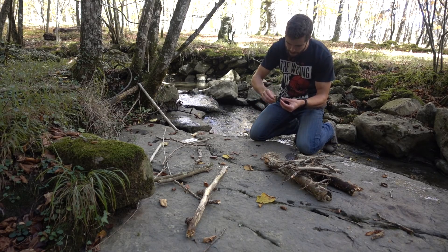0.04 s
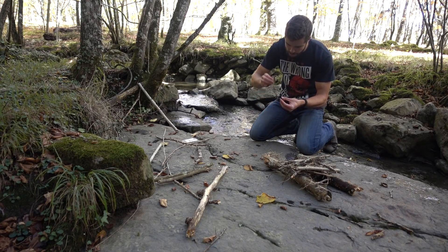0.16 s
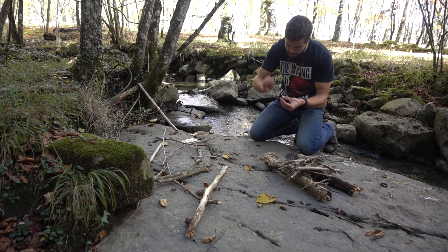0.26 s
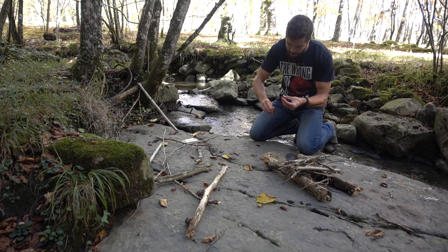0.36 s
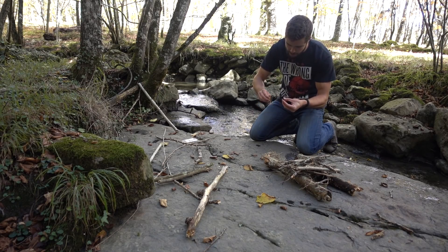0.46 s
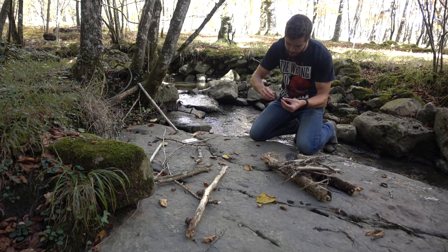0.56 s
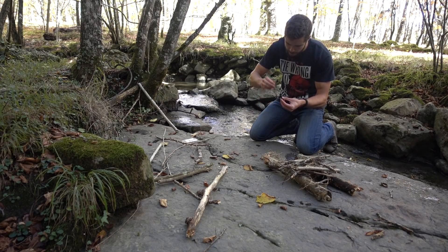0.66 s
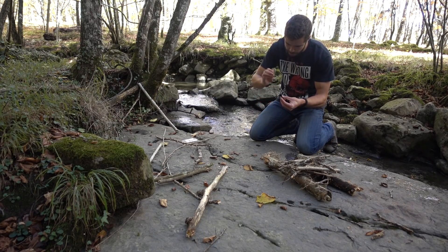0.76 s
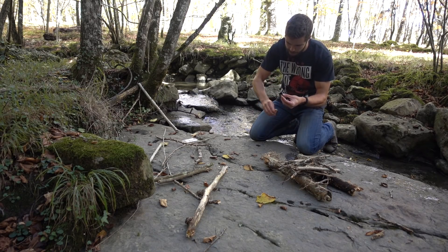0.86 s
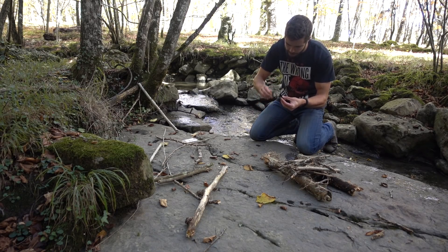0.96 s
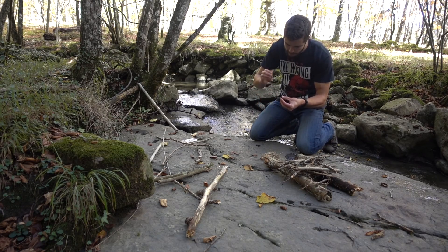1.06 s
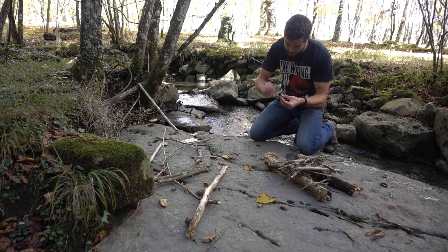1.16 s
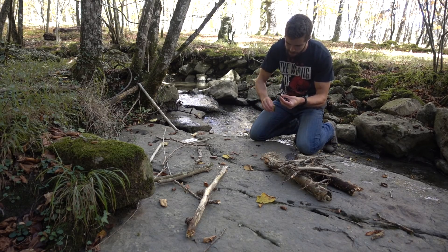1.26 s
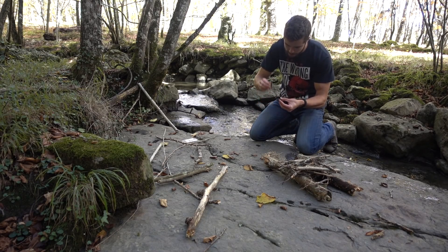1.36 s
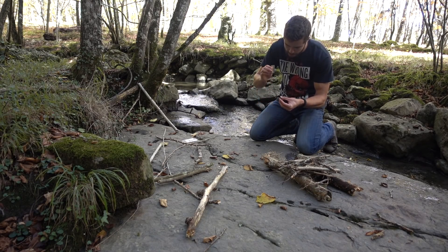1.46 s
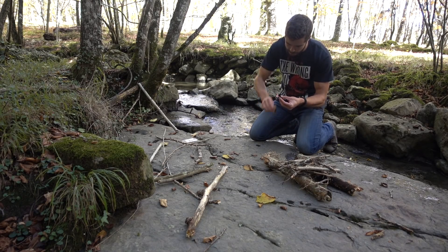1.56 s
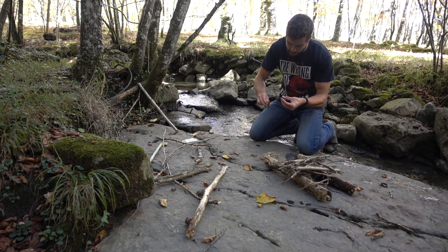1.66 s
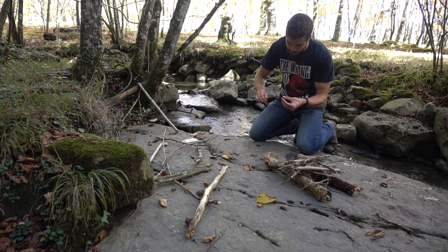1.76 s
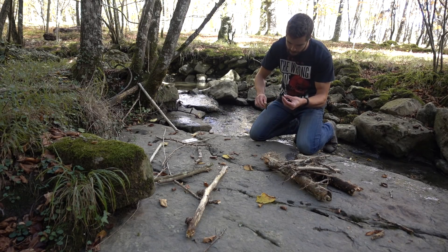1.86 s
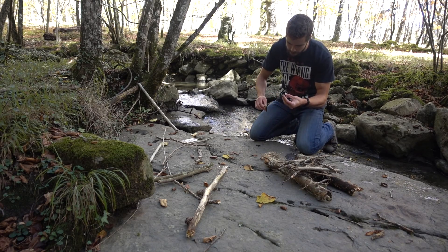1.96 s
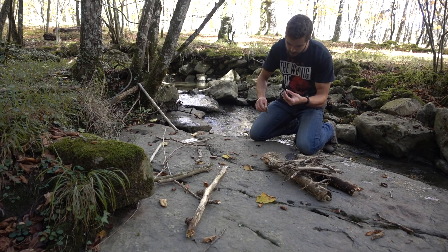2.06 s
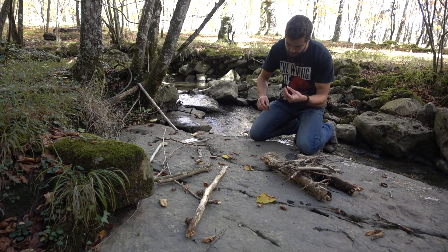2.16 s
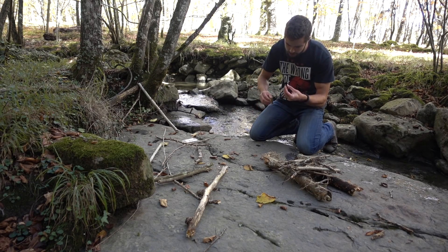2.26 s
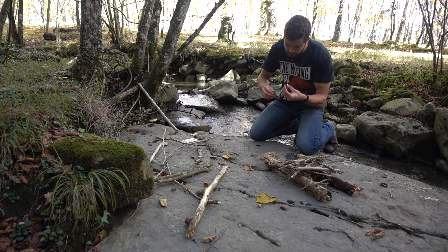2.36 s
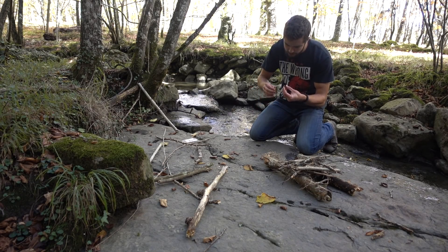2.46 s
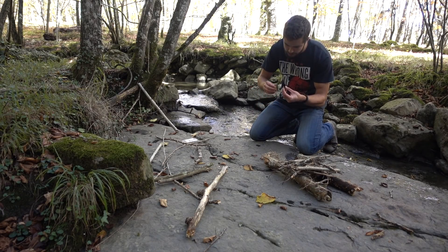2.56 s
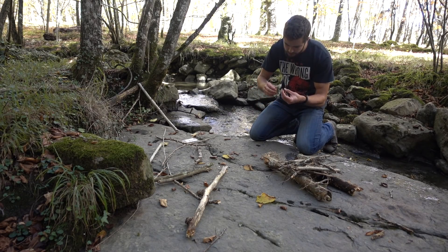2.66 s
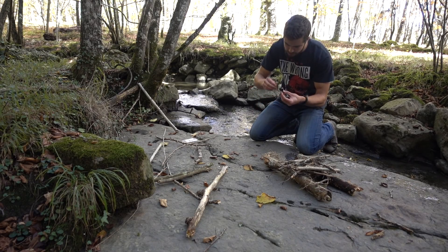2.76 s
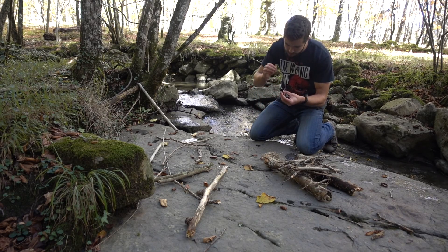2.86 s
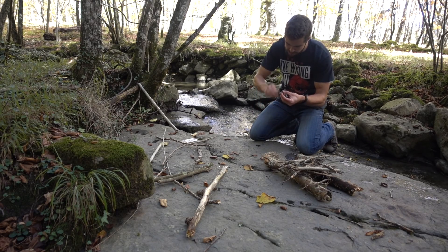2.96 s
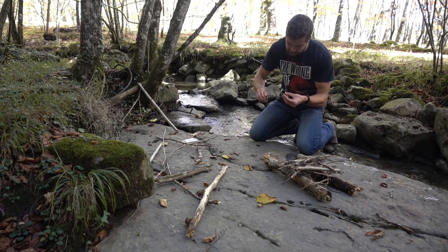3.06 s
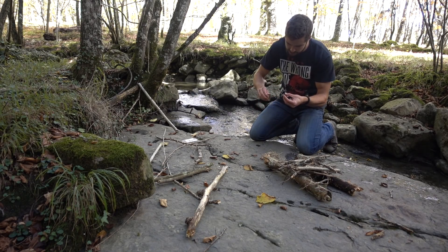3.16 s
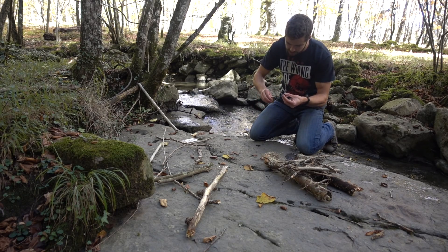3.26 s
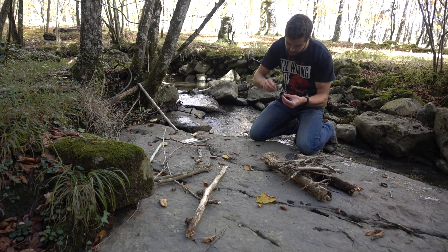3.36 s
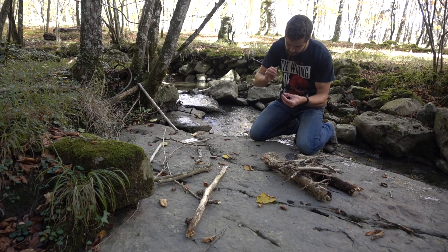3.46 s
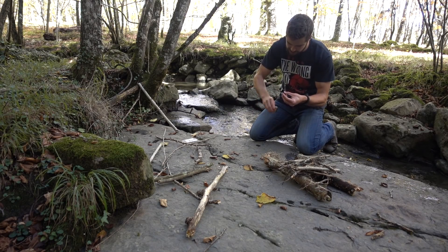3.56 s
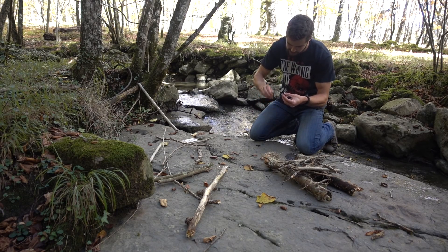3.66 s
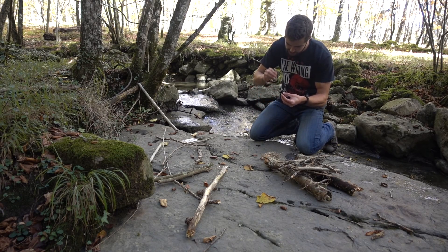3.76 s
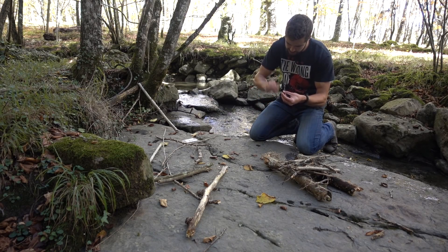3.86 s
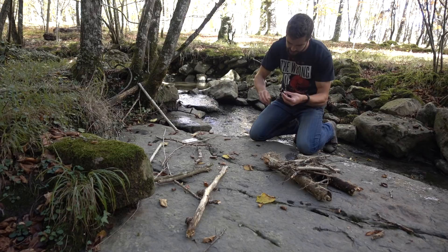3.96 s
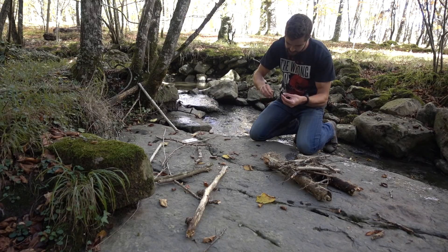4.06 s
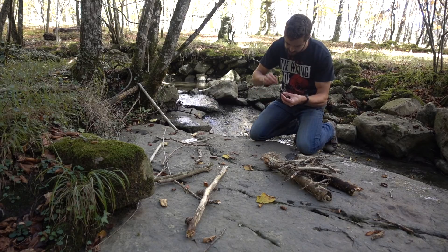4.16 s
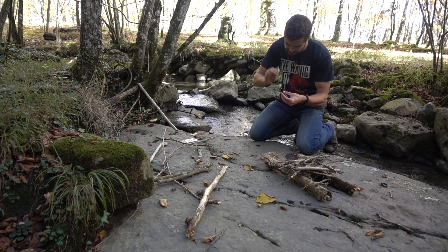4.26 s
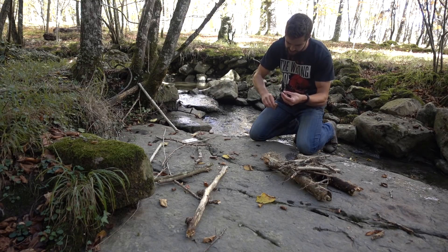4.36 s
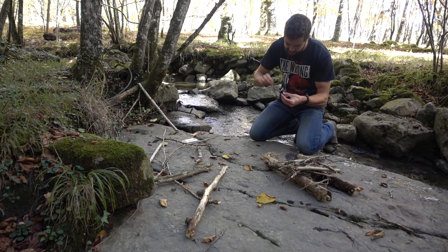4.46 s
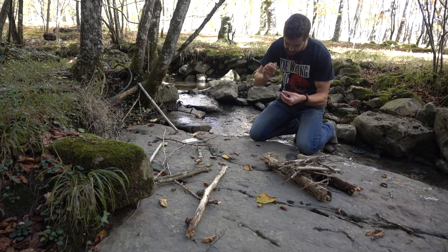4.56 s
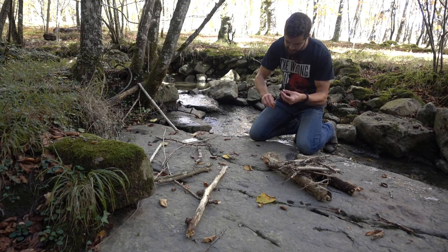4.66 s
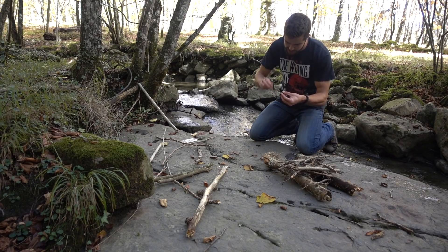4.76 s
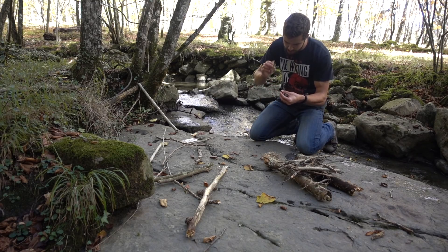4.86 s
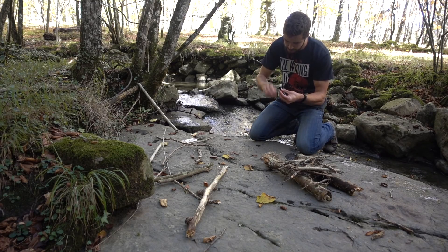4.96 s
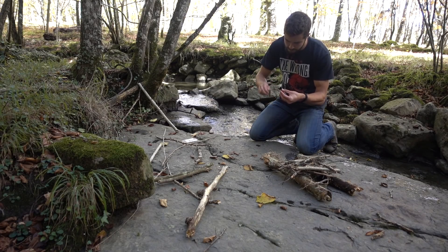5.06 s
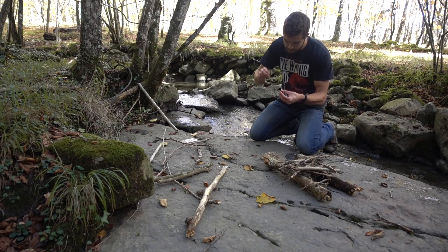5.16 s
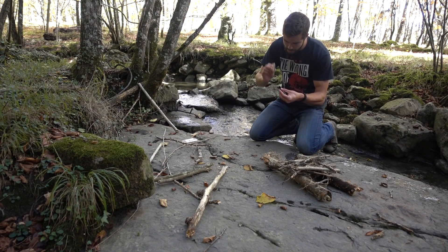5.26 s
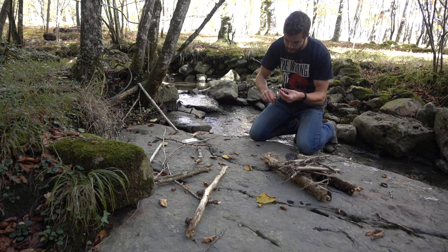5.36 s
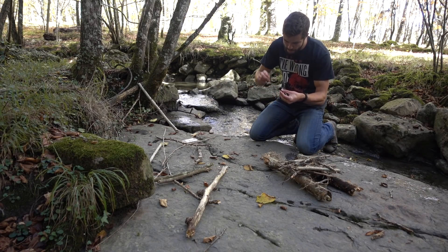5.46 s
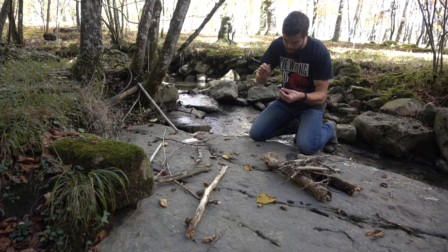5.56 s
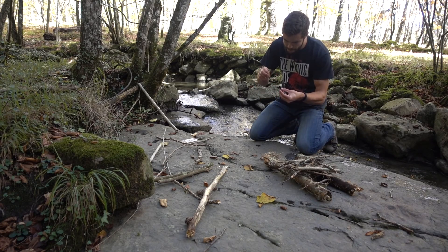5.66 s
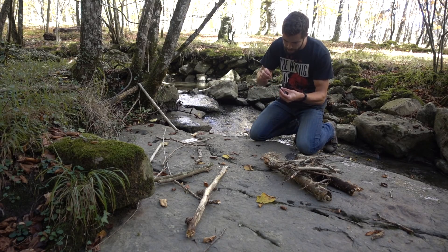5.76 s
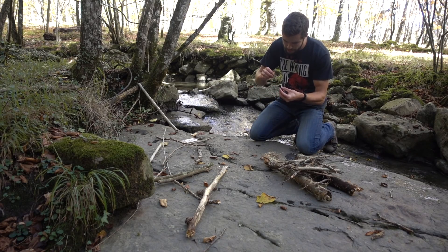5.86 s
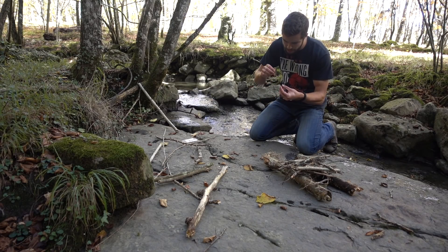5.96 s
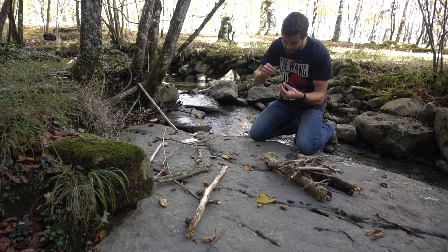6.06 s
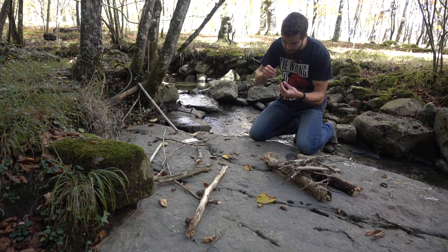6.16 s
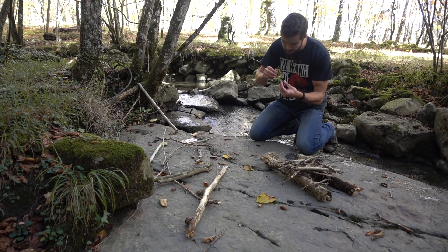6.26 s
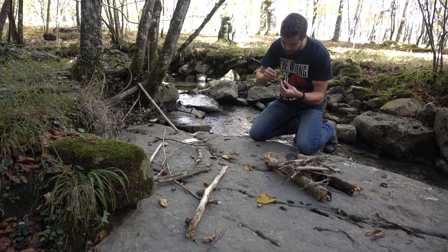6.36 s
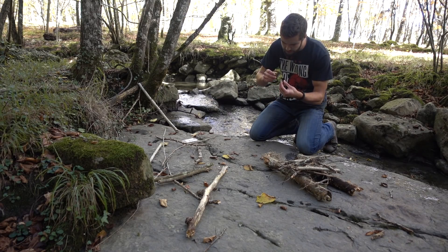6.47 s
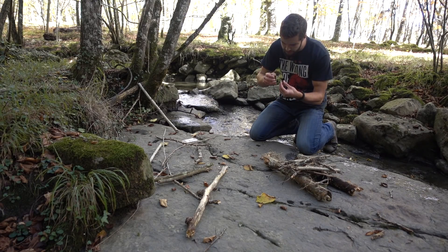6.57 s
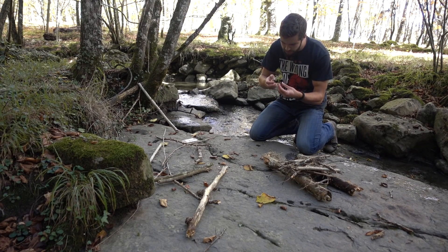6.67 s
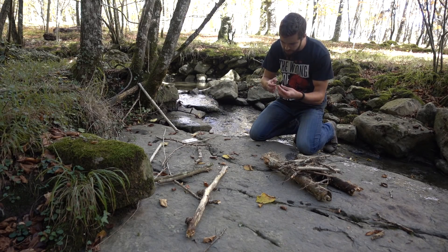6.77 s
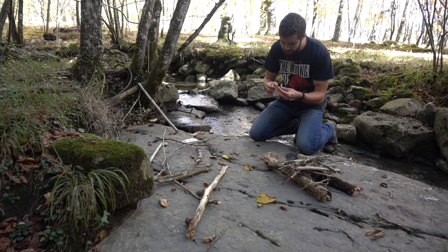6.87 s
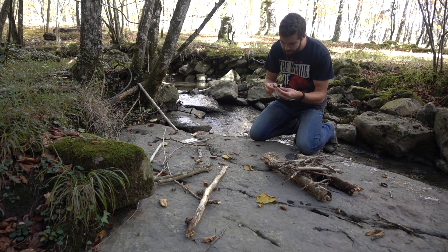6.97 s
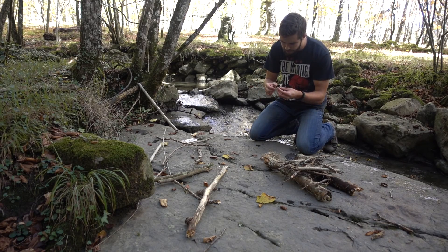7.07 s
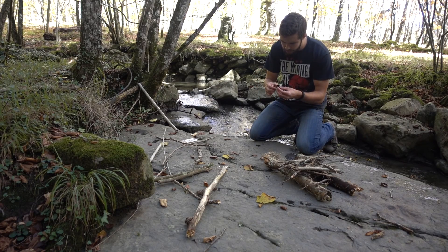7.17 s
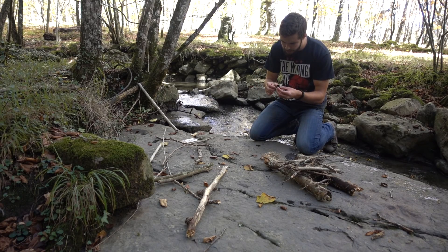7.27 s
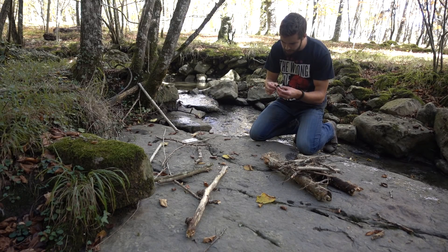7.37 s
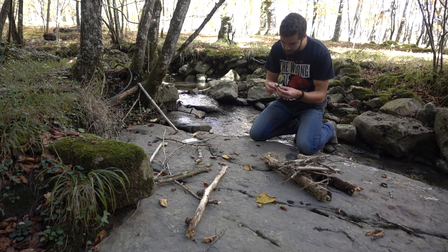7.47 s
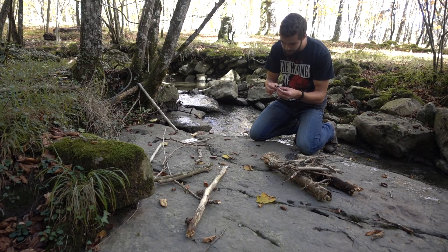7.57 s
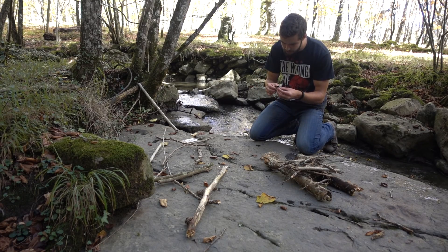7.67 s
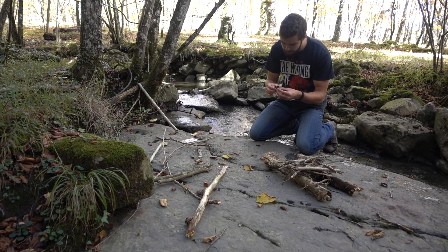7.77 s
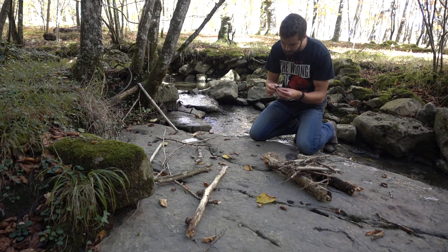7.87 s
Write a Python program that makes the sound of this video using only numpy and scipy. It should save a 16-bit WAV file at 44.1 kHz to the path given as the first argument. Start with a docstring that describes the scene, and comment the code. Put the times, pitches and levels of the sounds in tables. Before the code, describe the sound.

A small forest stream runs throughout, slightly left of centre: a soft, steady hiss with countless little bubbles, occasional clearer plops and faint high droplet ticks. In front of it, slightly to the right, a flint is struck against a hand-held steel six times. Each blow is a very brief, bright, gritty click with a trace of muffled metallic ring, no bass, and a short echo from rocks and trees. A light strike comes at about 0.4 seconds, strong ones at 1.6, 3.0, 4.0 and 5.0 seconds, and another light one at 5.4. At about 2.1 and 2.5 seconds come two faint, hoarse, distant whistles, probably a bird, the first rising, the second rising then dropping. From about 6.8 seconds the flint is turned in the fingers with small ticks and rubs, while the water carries on until the end at around 8 seconds.

```python
"""Flint and steel by a stream

Someone kneeling on a rock slab strikes a flint on a hand-held steel six times, then fingers the flake.
Each blow glances, bites and scrapes for a few milliseconds; rocks and tree trunks scatter it back.
Just behind, a little to the left, a small forest stream runs steadily: tiny splashes merge into a hiss,
and trapped air rings as countless bubbles and some clear plops.
Far off come two faint rising whistles, probably a bird."""
import sys
import numpy as np
from scipy import signal
from scipy.fft import rfft, irfft
from scipy.io import wavfile
from scipy.ndimage import uniform_filter1d

SR = 44100
rng = np.random.default_rng(int(sys.argv[2]) if len(sys.argv) > 2 else 0)


def inscribe(sig):
    """Save sig as 16-bit PCM at rate SR to the path in sys.argv[1].

    A 1-D sig is mono; a 2-D sig holds one channel per row.
    Samples are clipped to [-1, 1] before scaling.
    """
    pcm = np.round(np.clip(np.atleast_2d(sig).T, -1, 1) * 32767)
    wavfile.write(sys.argv[1], SR, pcm.astype(np.int16))


N = 349272
STREAM_LAG_S, HANDS_LAG_S = 8.5e-5, -1.8e-5  # how much sooner the left side hears each


def undb(db):
    """Turn decibels into a number to multiply by."""
    return 10 ** (np.asarray(db) / 20)


def unit(x):
    """Scale to an average strength (rms) of 1."""
    return x / np.sqrt(np.mean(x ** 2) + 1e-24)


def fade(t, t60):
    """Die away by 60 dB in the fade time t60."""
    return np.exp(-np.log(1000) * t / t60)


def surge(rate):
    """A smooth random swell of strength 1 that turns about rate times a second."""
    size = int(SR / rate)
    steps = np.repeat(rng.standard_normal(N // size + 1), size)
    return unit(uniform_filter1d(steps, size)[:N])


def hump(hz, centre_hz, width_hz):
    """The curve of a resonance: 1 at its centre, less on either side."""
    return 1 / (1 + ((hz - centre_hz) / width_hz) ** 2)


def read(points, hz):
    """Look up a frequency between the rows of an (f/Hz, value) table."""
    f, value = np.transpose(points)
    return np.interp(np.log(hz + 1), np.log(f), value)


def shape(x, response):
    """Multiply each frequency in a sound by response(hz)."""
    size = x.shape[-1]
    return irfft(rfft(x) * response(np.fft.rfftfreq(size, 1 / SR)), size)


def resonate(x, gain_db):
    """Boost each frequency by gain_db(hz), so that nothing rings ahead of its cause."""
    size = 2 * len(x)
    cepstrum = irfft(np.log(undb(gain_db(np.fft.rfftfreq(size, 1 / SR)))))
    causal = np.r_[cepstrum[0], 2 * cepstrum[1:len(x)]]
    return irfft(rfft(x, size) * np.exp(rfft(causal, size)))[:len(x)]


def cut_bass(x, hz, order=3):
    """Weaken everything below hz."""
    return signal.sosfilt(signal.butter(order, hz, "high", fs=SR, output="sos"), x)


def place(x, pan_db, lag_s):
    """One side hears a sound louder and sooner; positive values move it left."""
    late = shape(x, lambda hz: np.exp(-2j * np.pi * hz * lag_s))
    return np.array([x * undb(pan_db / 2), late * undb(-pan_db / 2)])


def add(out, s, x):
    """Mix a sound in, starting at s seconds."""
    i = int(np.clip(s * SR, 0, N - 1))
    out[..., i:i + x.shape[-1]] += x[..., :N - i]


# The tone of the stream's hiss: f/Hz, level/dB
WASH_TONE = [(100, -47), (200, -39), (310, -35.5), (400, -28), (500, -20), (630, -14.5), (850, -7),
             (1250, -6.5), (1800, -3.5), (2300, -3), (3100, -6.5), (4900, -9.5), (7500, -14),
             (10000, -16.5), (12000, -20), (15500, -21.5)]
# Which side the hiss leans to: f/Hz, left minus right/dB
WASH_PAN = [(100, 0.8), (700, 2.47), (1300, 2.3), (2400, 0.8), (4400, -1.5), (15000, -2.5)]
# How much of the hiss comes straight from the water: f/Hz, share (0-1)
WASH_DIRECT = [(100, 1), (640, 0.85), (1400, 0.83), (3100, 0.32), (7000, 0.077), (15000, 0.066)]


def wash(db=-47.5, flicker_db=1.95, spray_db=2.5):
    """Countless tiny splashes merge into a hiss; its lows come straight, its highs from all around."""
    water = rng.standard_normal((3, N))
    spray = np.repeat(rng.standard_normal((3, N // 16 + 1)), 16, axis=1)[:, :N]
    # cut the sound into small cells of pitch and time, and let their levels flicker
    _, _, cells = signal.stft(water * undb(spray_db * spray), SR, nperseg=256)
    flicker = uniform_filter1d(rng.standard_normal(cells.shape), size=9, axis=1)
    flicker = unit(uniform_filter1d(flicker, size=5, axis=2))
    water = signal.istft(cells * undb(flicker_db * flicker), SR)[1][:, :N]
    direct = shape(place(water[0], 0, STREAM_LAG_S), lambda hz: np.sqrt(read(WASH_DIRECT, hz)))
    around = shape(water[1:], lambda hz: np.sqrt(1 - read(WASH_DIRECT, hz)))
    sides = np.array([[.5], [-.5]])
    hiss = shape(direct + around, lambda hz: undb(read(WASH_TONE, hz) + sides * read(WASH_PAN, hz)))
    return undb(db) * unit(hiss)


def bubble(hz, cycles, glide, swell_s=.001):
    """A pocket of air rings, rising in pitch as it nears the surface; it fades 60 dB over its cycles."""
    t = np.arange(int((cycles / hz + swell_s) * SR) + 2) / SR
    turns = hz * t
    swell = 1 - np.exp(-(t / swell_s) ** 2)
    ring = np.sin(2 * np.pi * turns * (1 + glide * turns / cycles / 2)) * fade(turns, cycles) * swell
    return ring / np.abs(ring).max()


# How the bubbles' pitches are spread: share of bubbles that are lower (0-1), f/Hz
BUBBLE_PITCHES = [(0, 792), (0.049, 944), (.15, 1211), (.30, 1645), (0.479, 1774), (.76, 2322), (1, 3433)]
# The babble swells and sinks with the flow over the stones: t/s, level/dB
FLOW = [(0, 0.5), (.6, -0.5), (1.0, .5), (1.95, -.5), (2.25, 2.5), (2.55, 0.5), (2.9, 0.5), (3.3, 0),
        (4.3, 0), (5.2, 0.5), (6.0, -0.5), (6.6, -1.5), (7.2, 1.5), (7.9, 0)]


def babble(db=-54.0, size_db=4.0, cycles=32, glide=0.074, gulp_db=3, bubbles_per_fall=700):
    """Three little falls between the stones each shed a swarm of bubbles in uneven gulps."""
    out = 0
    shares, pitches = np.transpose(BUBBLE_PITCHES)
    for pan_db, lag_s in [(1.9, 4.7e-5), (3.5, 4.6e-5), (1, 2.4e-5)]:
        fall = np.zeros(N)
        for when, pitch, size, life in rng.random((bubbles_per_fall, 4)):
            hz = np.interp(pitch, shares, pitches)
            # most are faint, and the deep ones fainter
            loud_db = size_db * min(-np.log(size), 2.5) + 0.8 * read(WASH_TONE, hz)
            add(fall, when * N / SR, undb(loud_db) * bubble(hz, cycles * (.5 + life), glide))
        gulps = undb(gulp_db * np.tanh(surge(rate=12)))
        out = out + place(fall * gulps, pan_db, lag_s)
    flow_db = np.interp(np.arange(N) / SR, *np.transpose(FLOW))
    return undb(db + flow_db) * unit(out)


# The tone of what the banks and trunks send back: f/Hz, level/dB
ECHO_TONE = [(500, -1), (2000, -1), (4300, 8), (6700, 0.5), (8200, -0.5), (9500, -4), (12500, 5),
             (15000, -2.5)]


def forest_echo(x, near_db, near_t60, bank_db, bank_t60, far_db, far_t60, bank_delay_s, clump_db=0):
    """The slab and body echo at once, the rocky banks later, and the far trunks linger longest."""
    t = np.arange(SR) / SR
    banks = np.clip(t / bank_delay_s, 0, 1) ** 2 * fade(np.maximum(t - bank_delay_s, 0), bank_t60)
    near, far = fade(t, near_t60), fade(t, far_t60)
    decay = undb(near_db) * unit(near) + undb(bank_db) * unit(banks) + undb(far_db) * unit(far)
    clumps = undb(clump_db * np.tanh(surge(rate=380)[:SR]))  # single boulders echo in clumps
    scatter = unit(clumps * rng.standard_normal((2, SR)) * undb(6.8 * rng.standard_normal((2, SR))))
    scatter = shape(scatter, lambda hz: undb(read(ECHO_TONE, hz)))
    echoes = scatter * decay * (t > .001) / np.sqrt(SR)
    return signal.fftconvolve(x, echoes, axes=1)[:, :N]


def tick(hz, t60, width=0.082, grit_db=-4.5):
    """A brief gritty touch with one broad ring and no bass."""
    t = np.arange(SR // 5) / SR
    grit = rng.standard_normal(len(t)) * undb(grit_db * rng.standard_normal(len(t))) * fade(t, t60)
    touch = resonate(grit, lambda f: 20 * np.log10(hump(f, hz, width * hz)))
    return touch / np.abs(touch).max()


def droplets(middle_hz=7600, spread_octaves=0.42, db=-46, spread_db=4.0, count=45):
    """Spray from the falls lands on wet stone in faint, high pats."""
    out = np.zeros(N)
    for when, size, pitch in rng.random((count, 3)):
        pat = tick(middle_hz * 2 ** (spread_octaves * (2 * pitch - 1)), t60=0.027)
        add(out, when * N / SR, undb(db + spread_db * (2 * size - 1)) * pat)
    return place(out, pan_db=-1.5, lag_s=STREAM_LAG_S)


# The stream's loudest bubbles: t/s, level/dB, f/Hz, ring length/cycles, swell/s, left minus right/dB
PLOPS = [(0.1546, -31, 1580, 11, .001, 8), (0.183, -37.5, 1780, 55, .006, 5),
         (0.201, -33.5, 1516, 33, 0.0071, 0), (0.319, -33.5, 1705, 25, 0.0045, 3),
         (0.805, -43, 1005, 45, .001, 5), (0.952, -39.5, 1110, 30, .005, 1),
         (0.966, -37, 1440, 45, .001, 3), (0.981, -35, 1680, 20, .002, 3),
         (1.183, -31, 1575, 19, 0.0046, 4), (1.211, -37, 2090, 30, .004, 1),
         (1.278, -38, 1114, 25, 0.0037, 6), (1.6960, -32.5, 1726, 75, .0015, 4),
         (1.810, -40, 2940, 35, .004, 4), (2.066, -38, 1690, 50, .003, 3), (2.238, -39, 1480, 25, .006, 4),
         (2.334, -31, 1410, 22, 0.00091, 2), (2.4187, -35.5, 1330, 11, .0012, 7),
         (2.429, -38, 1090, 24, .002, 4), (2.493, -42, 1020, 26, .003, 4), (2.583, -37, 1680, 76, .001, 4),
         (2.775, -38.5, 1250, 22, 0.0055, 4), (2.812, -35.5, 1720, 24, 0.0046, 5),
         (2.894, -38, 1790, 34, .006, 2), (3.359, -38, 1020, 24, .006, 3),
         (3.723, -35.5, 1485, 34, .003, 7), (3.985, -38, 1530, 45, .001, 3),
         (4.092, -42, 2380, 50, .005, 2), (4.169, -41, 890, 58, .004, 2), (4.209, -32, 1780, 30, .004, 2),
         (4.347, -27, 1440, 10, .0015, 6), (4.393, -38.5, 1000, 30, 0.0011, 5),
         (4.655, -34.5, 1620, 63, .0008, 6), (4.808, -32.5, 1660, 27, .004, 6),
         (4.954, -34.5, 1086, 17, 0.0036, 7), (5.418, -36.5, 1640, 26, .004, 5),
         (6.097, -39, 2530, 44, .004, -1), (6.1525, -35.5, 1480, 16, .003, 1),
         (6.267, -39.5, 1810, 38, .003, 5), (6.7145, -34, 1720, 50, .0015, 0),
         (6.828, -36.5, 1330, 14, 0.0011, 5), (6.861, -39.5, 1140, 56, 0.0022, 5),
         (6.954, -40, 1150, 40, .003, 5), (7.058, -38, 1610, 35, .003, 3), (7.141, -39.5, 945, 16, .002, 2),
         (7.324, -41, 2140, 45, .006, 3), (7.340, -39, 1830, 37, .006, -1),
         (7.6877, -28, 1344, 21, 0.0017, 4)]


def plops(gain_db=-0.4, glide=0.037):
    """Larger bubbles stand out of the babble, from sudden blips to round, swelling notes."""
    out = np.zeros((2, N))
    for s, db, hz, cycles, swell_s, pan_db in PLOPS:
        plop = undb(db + gain_db) * bubble(hz, cycles, glide, swell_s)
        add(out, s, place(plop, pan_db, STREAM_LAG_S))
    return cut_bass(out, hz=700)


def edge_slips(glance_s, glance_db, scrape_s, catch_s, catch_db, grit_db=6, touch_db=13, bite_db=16):
    """The edge touches, skids, bites, tears along the steel in tiny slips and catches as it leaves."""
    since_bite = np.arange(SR // 10) / SR - glance_s
    release = fade(np.maximum(since_bite - scrape_s, 0), t60=0.0091)
    catch = undb(catch_db) * np.exp(-((since_bite - catch_s) / 0.0012) ** 2)
    pressure = np.where(since_bite < 0, undb(glance_db), release) + catch
    noise, grit = rng.standard_normal((2, len(since_bite)))
    slips = pressure * unit(noise * undb(grit_db * np.clip(grit, -2, 2)))
    slips[0] = undb(glance_db + touch_db)
    slips[np.argmax(since_bite >= 0)] = undb(bite_db)
    return slips


# The notes of steel and flint, muffled by the fingers: f/Hz, level/dB, fade time/s
RING_NOTES = [(1977, -1.5, 0.019), (2310, -5.5, 0.033), (2620, -4.5, 0.071), (3530, -20, 0.045),
              (4570, -15, 0.032), (4790, -2.5, 0.022), (5060, -8.5, 0.022), (5860, -2, 0.013),
              (6740, -2.5, 0.015), (7670, -1, 0.01), (8190, 3.5, 0.015), (8190, -19, 0.14),
              (8600, -12, 0.01), (9560, -5.5, 0.011)]
# The tone of chipping stone: f/Hz, level/dB
CRACK_TONE = [(100, -64), (500, -21.5), (1000, -8), (1500, -4.5), (2050, 6), (3300, -2), (5200, -5),
              (7200, 3), (10000, 0), (11200, -15.5), (12800, -14), (14200, -3.5), (15500, -2)]


def ring_and_crack(slips, ring_db, detune=.005):
    """The slips set both pieces ringing while the stone chips with a crack."""
    t = np.arange(len(slips)) / SR
    ring = 0
    for hz, db, t60 in RING_NOTES:
        held_hz = hz * (1 + detune * rng.uniform(-1.1, 1))  # the grip shifts from blow to blow
        note = signal.fftconvolve(slips, np.cos(2 * np.pi * held_hz * t) * fade(t, t60))[:len(t)]
        ring = ring + undb(db) * unit(note)
    crack = resonate(slips, lambda hz: read(CRACK_TONE, hz))
    return undb(ring_db) * unit(ring) + unit(crack)


# The blows: t/s of the bite, level/dB, glance length/s, glance level/dB, scrape length/s,
# catch after the bite/s, catch level/dB, brightness/dB per octave, favoured ring f/Hz, its boost/dB,
# low clack/dB, high sizzle/dB, extra level toward the banks/dB
BLOWS = [(0.371, -28, .0015, -24, 0.0012, 0.0029, -14, -1.4, 6350, 11, 0.5, -1, -2),
         (1.6230, -19.5, 0.0039, -6, 0.0037, 0.007, -12, 1.5, 8200, 7.5, 3, 2, 0.5),
         (3.0390, -18.5, 0.0024, -5, 0.0028, 0.0053, -1, -0.5, 9300, 3, 1, -2, 0.5),
         (3.9546, -21, 0.0026, -11, 0.0017, .0100, -18, 2, 6430, 14, 6, -13, -3),
         (5.0385, -19, .0046, -15.5, 0.0046, .0075, -10, 0, 8150, 3, 2, -3, 1),
         (5.3860, -29.5, 0.0013, -23, 0.0013, .008, -20, -0.5, 3740, 6, 11, 7, 0)]


def strikes(gain_db, focus, ring_db, outward=False, clack_hz=2040, sizzle_hz=14700):
    """Flint hits steel, heard in front or outward; focus (0-1) scales the favoured ring and sizzle."""
    out = np.zeros(N)
    for row in BLOWS:
        bite_s, db, glance_s, glance_db, scrape_s, catch_s, catch_db = row[:7]
        tilt_db, favoured_hz, boost_db, clack_db, sizzle_db, banks_db = row[7:]
        slips = edge_slips(glance_s, glance_db, scrape_s, catch_s, catch_db)
        blow = ring_and_crack(slips, ring_db)
        # where the edge lands sets the tone
        blow = resonate(blow, lambda hz: tilt_db * np.log2((hz + 500) / 5000)
                        + focus * boost_db * hump(hz, favoured_hz, 510)
                        + clack_db * hump(hz, clack_hz, 330)
                        + focus * sizzle_db * hump(hz, sizzle_hz, 1500))
        blow = unit(cut_bass(blow, hz=560))  # pieces this small give off almost no bass
        add(out, bite_s - glance_s, undb(db + gain_db + outward * banks_db) * blow)
    return out


def strike_echo(pan_db=-3, directions=4):
    """The blows sound a little different in each direction, so their echoes blur into a gritty hiss."""
    sides = undb(np.array([[pan_db], [-pan_db]]) / 2)
    out = 0
    for _ in range(directions):
        sent = sides * strikes(gain_db=-9.5, focus=0.44, ring_db=-8, outward=True)
        out = out + forest_echo(sent, near_db=-12, near_t60=0.062, bank_db=-19.5, bank_t60=0.19,
                                far_db=-20.5, far_t60=0.85, bank_delay_s=0.035, clump_db=6)
    return out / np.sqrt(directions)


# The clearest small ticks: scattered ones probably stream droplets, the late cluster the flake
# being fingered: t/s, level/dB, f/Hz, fade time/s
TICKS = [(0.559, -40, 7700, .04), (3.410, -41, 7930, .03), (3.5234, -43, 5430, .03),
         (4.127, -39.5, 6250, .02), (4.557, -36, 9300, 0.031), (6.7915, -33.5, 3320, .01),
         (6.807, -45, 7400, 0.045), (6.9451, -40.5, 7160, .035), (7.027, -42, 11500, .01),
         (7.0718, -36, 7200, .025), (7.1082, -41, 7650, .03), (7.3961, -39, 5350, .02),
         (7.5443, -42, 9240, .025), (7.5882, -43, 5390, .025), (7.780, -40, 8200, .04),
         (7.8106, -43, 5300, .025)]


def ticks(gain_db=-2, turn_at_s=6.78, turn_s=.42, rub_hz=6460, rub_db=-48.5, rubs=12):
    """Scattered ticks, probably droplets; after the last blow the fingered flake ticks and rubs."""
    out = np.zeros(N)
    for s, db, hz, t60 in TICKS:
        add(out, s, undb(db) * tick(hz, t60))
    for when, size, pitch, life in rng.random((rubs, 4)):  # the flake is turned over
        rub = tick(rub_hz * 2 ** (0.29 * (2 * pitch - 1)), t60=0.15 * (.5 + life))
        add(out, turn_at_s + when * turn_s, undb(rub_db + 2 * (2 * size - 1)) * rub)
    return place(undb(gain_db) * out, pan_db=-2.2, lag_s=HANDS_LAG_S)


# Far-off notes: t/s, length/s, level/dB, start f/Hz, bend f/Hz, end f/Hz, waver (share of the pitch)
WHISTLES = [(2.099, .18, -53, 2452, 3205, 3420, 0.116), (2.511, .19, -49.5, 2373, 2880, 2535, 0.0516)]


def whistles(bend_share=.65, wavers_per_s=900):
    """Two hoarse notes climb and level off, then one rises and one drops; the trees smear them."""
    out = np.zeros(N)
    for s, length_s, db, start_hz, bend_hz, end_hz, waver in WHISTLES:
        along = np.linspace(0, 1, int(length_s * SR))
        before = np.maximum(1 - along / bend_share, 0)
        after = np.maximum(along - bend_share, 0) / (1 - bend_share)
        tune_hz = bend_hz + (start_hz - bend_hz) * before ** 2 + (end_hz - bend_hz) * after ** 2
        hz = tune_hz * (1 + waver * surge(wavers_per_s)[:len(along)])
        swell = np.sqrt(np.abs(np.sin(np.pi * along)))
        add(out, s, undb(db) * unit(swell * np.sin(2 * np.pi * np.cumsum(hz) / SR)))
    return forest_echo(np.array([out, out]), near_db=-4, near_t60=0.05, bank_db=-13, bank_t60=0.33,
                       far_db=-12, far_t60=.8, bank_delay_s=0.03)


def scene():
    """Flint and steel slightly to the right, the stream behind, both among the same rocks and trees."""
    blows = strikes(gain_db=-12, focus=1, ring_db=-1.5)
    close = place(blows, pan_db=-2, lag_s=HANDS_LAG_S) + ticks()
    bubbles = babble() + plops()
    bubble_echo = forest_echo(bubbles, near_db=-7, near_t60=0.13, bank_db=-11, bank_t60=0.34,
                              far_db=-26, far_t60=0.58, bank_delay_s=0.017)
    return close + strike_echo() + bubbles + bubble_echo + wash() + droplets() + whistles()


def record(dry, low_hz=174, top_hz=15750):
    """Thin out the bass and cut the very highest treble."""
    thin = cut_bass(dry, low_hz, order=4)
    return signal.sosfilt(signal.ellip(10, .1, 70, top_hz, fs=SR, output="sos"), thin)


dry = scene()
out = record(dry)
inscribe(out)
```